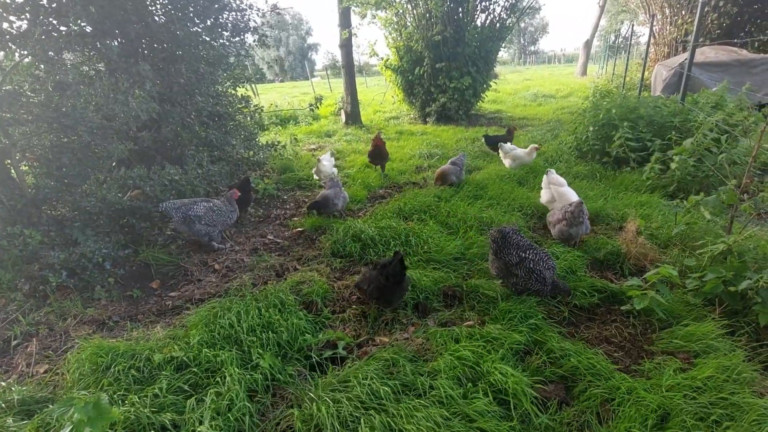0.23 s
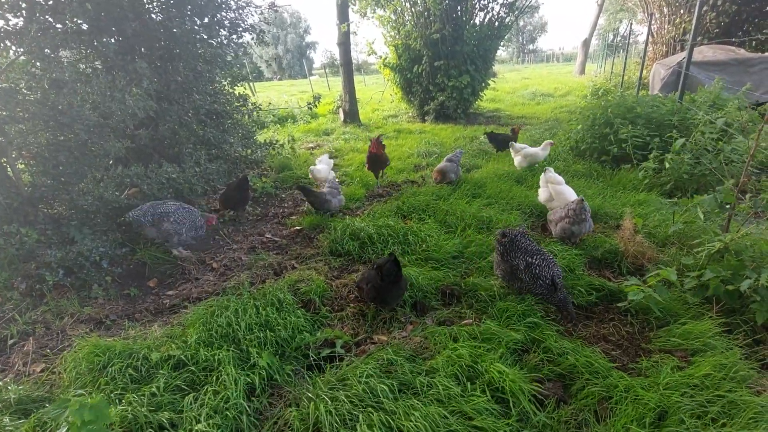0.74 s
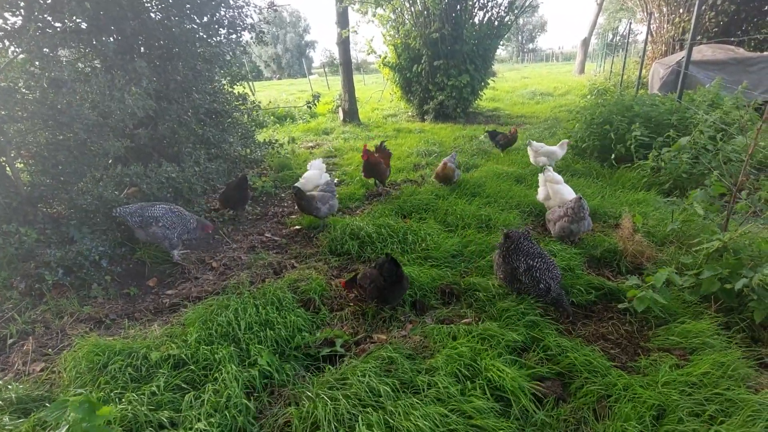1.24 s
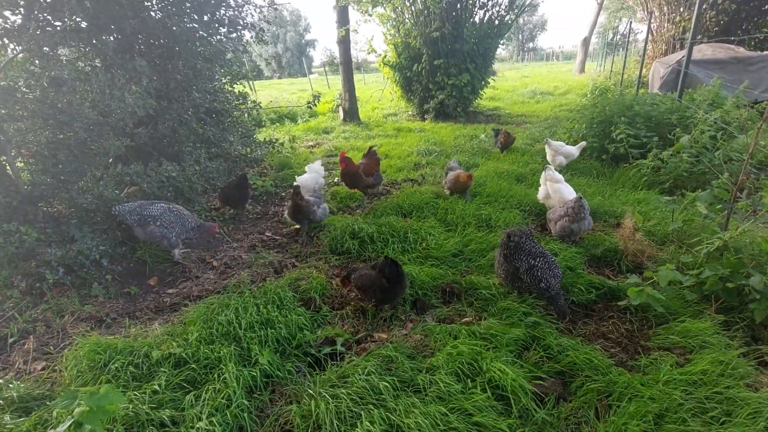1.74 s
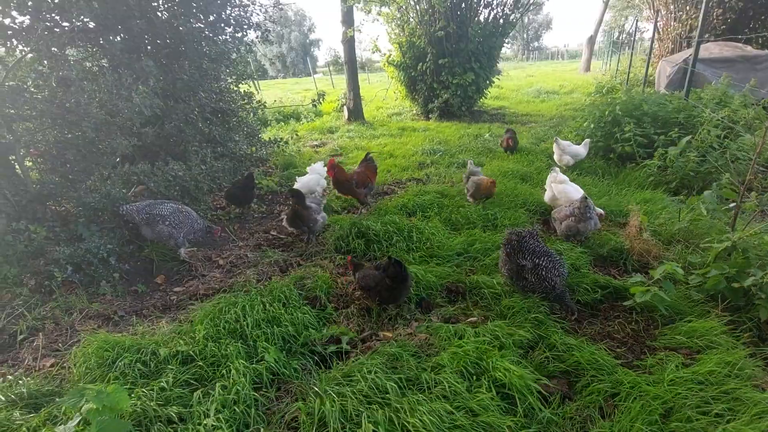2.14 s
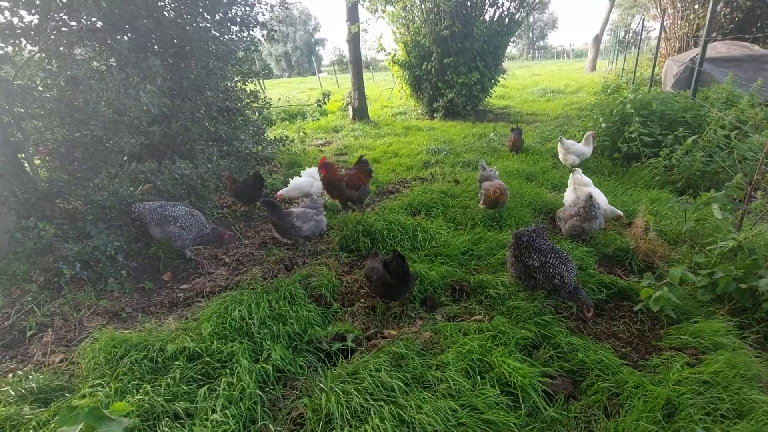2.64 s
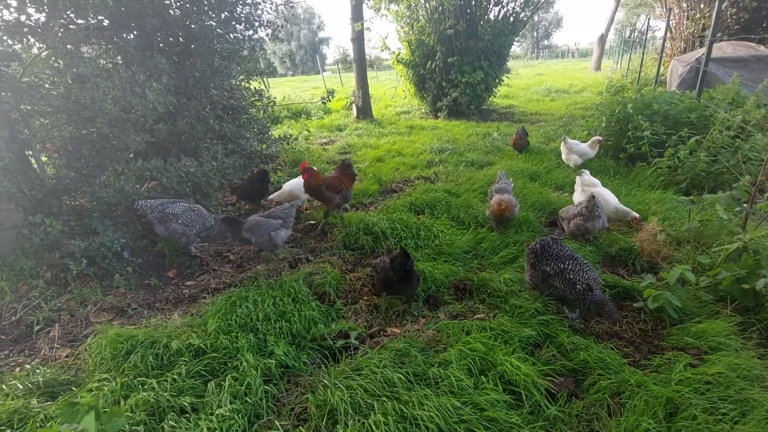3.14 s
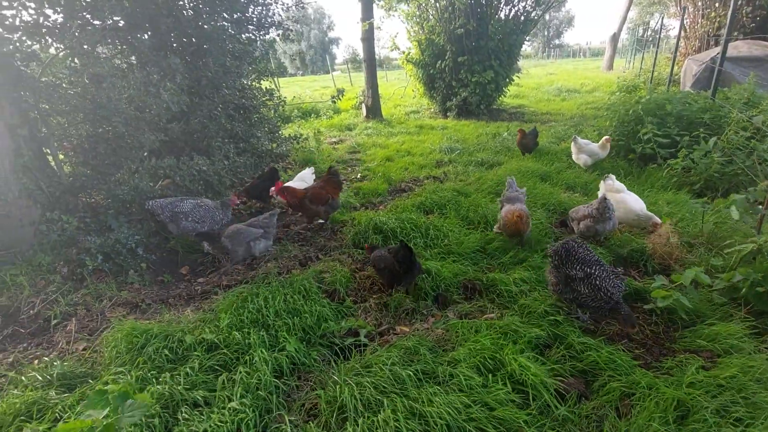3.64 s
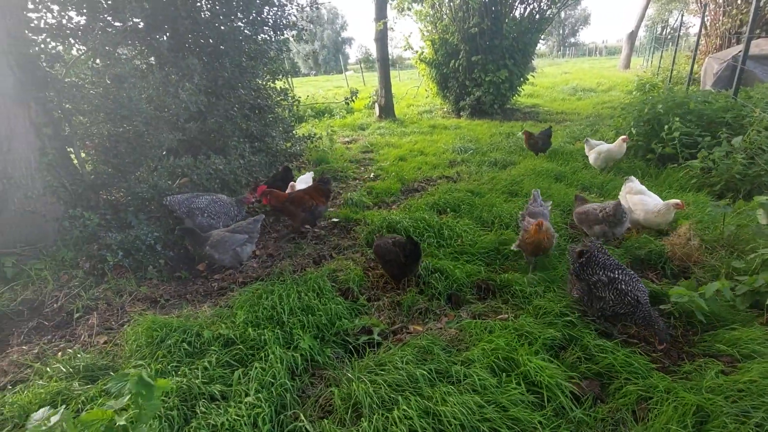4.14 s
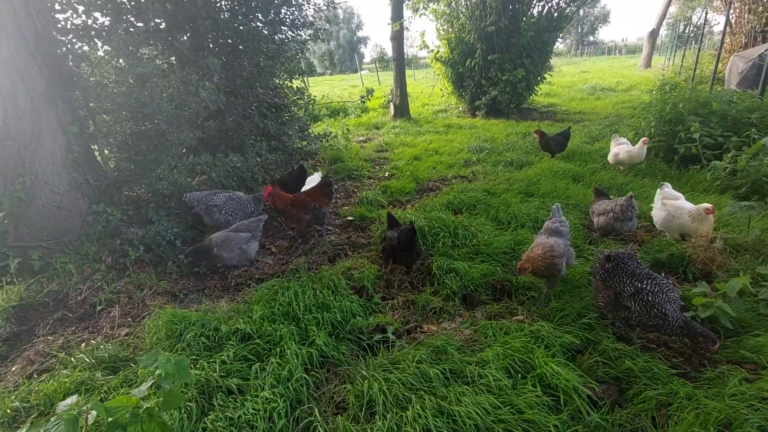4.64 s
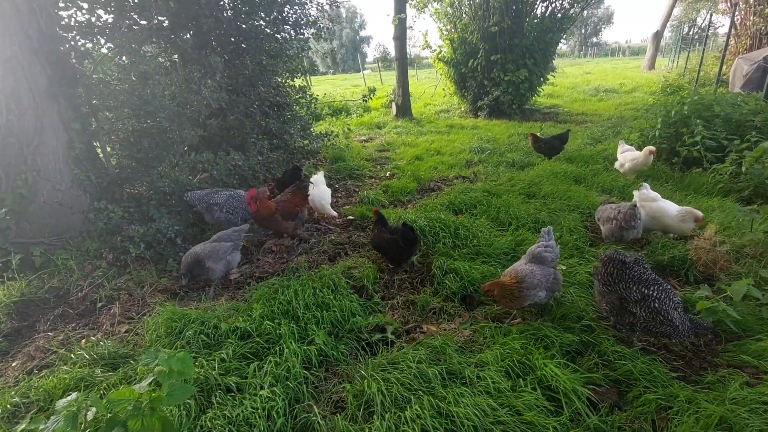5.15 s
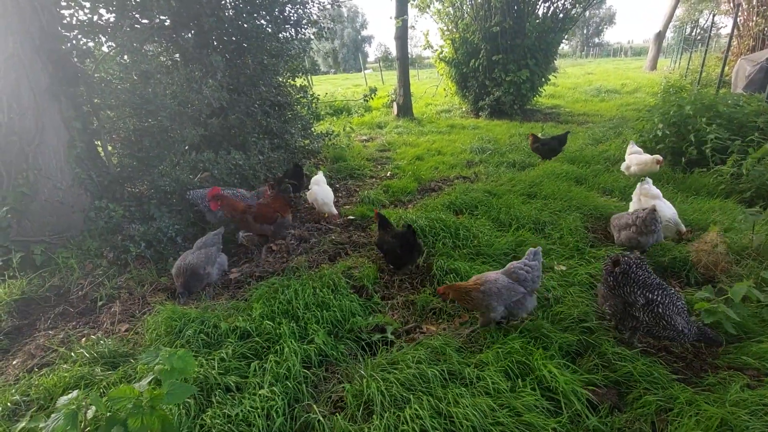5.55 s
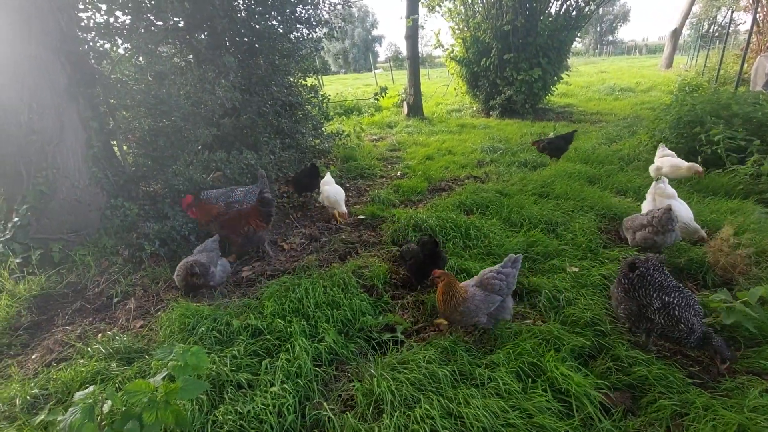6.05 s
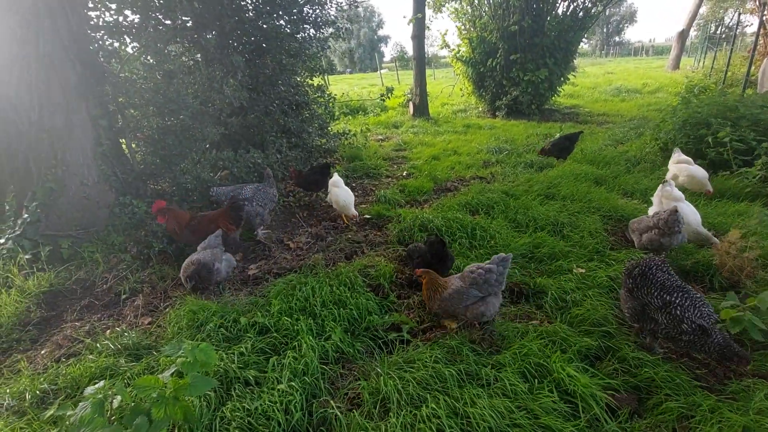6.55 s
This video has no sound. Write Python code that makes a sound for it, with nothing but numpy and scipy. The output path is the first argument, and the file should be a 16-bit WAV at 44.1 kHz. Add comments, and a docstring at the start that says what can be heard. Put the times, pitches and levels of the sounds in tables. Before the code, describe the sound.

A quiet open garden with steady, slightly sinking hiss and almost no echo. Small wind puffs begin around 0.3 s, and low thumps bump the microphone at 0.7-1.1 s. Soft coos and first faint clucks come at 1.3-1.7 s, then three clearer throaty clucks at about 2.1, 2.2 and 2.4 s. Wind returns from 2.5 s; a thin, wavering hen whine runs 2.6-3.0 s, ending on a lower tone, before the strongest low buffeting at 3.1-3.4 s, with small coos partly buried. As the wind eases, a string of short muffled clucks runs from 3.8 to 4.7 s, with a tiny tick near 4.4 s and light grass rustles. From 4.8 to 5.7 s, creaky low growls, hollow croons and brief coos overlap. Afterwards it is calm: crisp faint grass swishes around 5.6-6.0 and 6.6 s, one very soft coo at 6.3 s, and hiss.

```python
"""A steady garden hiss opens the scene, with soft puffs of wind that soon swell and thump at two mic ports.
Hens then call: clucks, coos, growls and croons pulse through throat resonances; a whine stacks harmonics.
Wind is lumpy low noise plus one-cycle thumps; grass is crackling noise that hisses in gusts and rustles.
A beak ticks once on a twig, and a thin scatter from bushes, ground and trees trails the calls."""
import sys
import numpy as np
from scipy import signal
from scipy.fft import rfft, irfft
from scipy.io import wavfile
from scipy.ndimage import uniform_filter1d, map_coordinates

SR = 44100
rng = np.random.default_rng(int(sys.argv[2]) if len(sys.argv) > 2 else 0)


def materialize(psi):
    """Save the field psi as 16-bit PCM at rate SR to the path in sys.argv[1].

    A 1-D psi becomes a single channel; in a 2-D psi each row is a channel.
    """
    bounded = np.clip(np.atleast_2d(psi).T, -1, 1)
    quanta = np.round(bounded * 32767).astype(np.int16)
    wavfile.write(sys.argv[1], SR, quanta)


N = 299350
TIME = np.arange(N) / SR
FREQS = np.fft.rfftfreq(N, 1 / SR)

# hush spectrum: [freq_hz, relative level_db per Hz]
AIR_SPECTRUM = [(25, -24), (55, 3), (110, -15), (290, -5.5), (730, -9), (1360, -14), (4200, -13),
                (7460, -16.5), (8670, -22), (12000, -15), (15800, -19.5)]
# stereo tilt of the hush: [freq_hz, left_minus_right_db]
AIR_BALANCE_BY_HZ = [(100, 6), (2300, -1), (4400, -0.5), (7000, -5.5), (12000, -3)]
# how alike the hush is at both ports: [freq_hz, likeness 0 to 1]
AIR_LIKENESS_BY_HZ = [(100, 1), (600, 0.66), (1400, 0)]
AIR_DB, AIR_DB_PER_S = -54, -0.3351  # the hush sinks slowly

# gusts of wind: [centre_s, half_length_s, level_db, left_minus_right_db]
GUST_EVENTS = [(0.258, 0.069, -48, 1.5), (0.576, 0.086, -48.5, -1), (0.756, 0.047, -32.5, -2.5),
               (0.853, 0.024, -33, -1), (0.987, 0.16, -45, -2), (2.267, 0.28, -45.5, -3.5),
               (2.668, 0.16, -40, -7.5), (3.175, 0.18, -36, -2), (3.636, 0.37, -41, 0),
               (6.72, 0.082, -59, 6)]
# wind turbulence spectrum: [freq_hz, relative level_db per Hz]
BUFFET_SPECTRUM = [(20, -17), (60, 2), (130, 1.5), (180, -8), (265, -8), (400, -18), (600, -35.5),
                   (1500, -82)]
# single eddies that thump: [centre_s, level_db, pitch_hz, left_minus_right_db]
THUMP_EVENTS = [(0.49, -36.5, 80.5, 3), (0.712, -25.5, 156, 2), (0.767, -20.5, 139, -11),
                (0.846, -23.5, 234, 0), (1.053, -28, 83.4, 3), (2.497, -28, 160, 3), (2.79, -31.5, 241, -9),
                (3.08, -19.5, 179, 2), (3.096, -19, 92, 1), (3.177, -24, 204, -4), (3.198, -26, 233, -1),
                (3.236, -16.5, 130, 2), (3.255, -18, 197, 2), (3.36, -21, 71.4, -2), (3.38, -24.5, 119, 0),
                (4.085, -38.5, 170, -3)]
BREEZE_DB, BREEZE_DB_PER_S = -57, -2  # the light air between gusts dies down
GUST_STEEPNESS = 2.44  # 2 is a bell; more gives a flat top with sudden ends
# stronger gusts hold smaller eddies: exponent, lower edge of the bright part, gust level that leaves it as is
GUST_BRIGHTENS, GUST_BRIGHT_HZ, GUST_FULL_DB = 0.4, 230, -40

# grass spectrum: [freq_hz, relative level_db per Hz]
GRASS_SPECTRUM = [(1200, -5), (3500, 1), (5500, -1.5), (8800, -5.5), (11500, 2), (15500, -7)]
# rustles in the grass: [centre_s, half_length_s, level_db, crisp_top_db]
RUSTLE_EVENTS = [(0.716, .018, -62, -5), (0.79, 0.08, -66, 0), (4.21, 0.078, -59, 2),
                 (4.36, 0.062, -68, 12.5), (4.632, 0.015, -56.5, 2), (4.763, .08, -65, 7.5),
                 (5.587, 0.041, -58.5, -1), (5.94, 0.01, -64.5, 9.5), (6.025, 0.033, -59.5, 6.5),
                 (6.604, 0.057, -61.5, 5.5)]
GUST_HISS_DB, GUST_CRISP_DB = -20.5, -17  # stirred grass relative to the gust; gain of its crisp top
CRACKLES_PER_S, CRACKLE_DB = 260, -6.5  # dry blades snap; level relative to the rubbing noise
BLADE_PATCH_DB = 3  # how far the colour of a swish shifts

TICK_S, TICK_DB, TICK_HZ, TICK_WIDTH_HZ, TICK_DECAY_S = 4.362, -50.5, 1900, 700, 0.0072  # level before decay

# soft coos: [start_s, length_s, level_db, middle_pitch_hz, glide_hz_per_s, throat_hz]
COO_NOTES = [(1.27, 0.074, -56, 283, -400, 830), (1.349, 0.083, -61.5, 340, 200, 965),
             (1.495, 0.072, -54, 338, 697, 880), (2.792, 0.059, -54, 396, -450, 830),
             (3.064, 0.05, -54.5, 324, 351, 950), (3.267, 0.098, -55.5, 329.3, 200, 950),
             (3.435, 0.033, -65, 408, 0, 800), (3.57, 0.029, -55.5, 315, -100, 890),
             (3.597, 0.083, -66, 408, -450, 810), (5.279, 0.055, -55.5, 376, 1002, 754),
             (5.385, 0.037, -56.5, 382, 204, 780), (5.44, 0.031, -56.5, 294, -78, 880),
             (5.518, 0.034, -53.5, 306, -100, 600), (5.561, 0.062, -60.5, 414, -250, 830),
             (6.284, 0.094, -65.5, 300, 496, 890)]
# throat resonances in a coo: [multiple of throat_hz, width_hz, level_db]
COO_RESONANCES = [(.34, 200, -2), (.68, 220, -7), (1, 320, 0)]
COO_ARCH_DB = 2.5  # drop of a coo's ends below its table level
# growls: [start_s, length_s, start_level_db, start_pitch_hz, sag_hz_per_s, throat_hz]
GROWL_NOTES = [(4.833, 0.38, -56.5, 152, 92.5, 695), (5.031, 0.18, -56, 164, 87, 710),
               (5.436, 0.23, -66, 152, 28.2, 710)]
# throat resonances in a growl: [multiple of throat_hz, width_hz, level_db]
GROWL_RESONANCES = [(.44, 140, 1), (.78, 240, -1), (1.02, 210, 2.5), (1.2, 200, -4)]
GROWL_SWELL_DB_PER_S, GROWL_RELEASE_S = 9, 0.027
# croons: [start_s, length_s, level_db, start_pitch_hz, glide_hz_per_s, throat_hz]
CROON_NOTES = [(5.179, 0.07, -54, 470, 329, 800), (5.295, 0.093, -57.5, 476, 75, 536),
               (5.422, 0.195, -53, 463, -140, 696)]
# throat resonances in a croon: [multiple of throat_hz, width_hz, level_db]
CROON_RESONANCES = [(.74, 340, 0), (1.17, 300, -10)]
CROON_ARCH_DB = 3  # drop of a croon's ends below its table level
# course of the whine, which catches, levels out, then breaks lower: [time_s, pitch_hz, level_db]
WHINE_COURSE = [(2.595, 437.5, -50.5), (2.626, 397.3, -51), (2.654, 441.2, -53), (2.68, 415, -59),
                (2.72, 440, -55), (2.8, 443, -53.5), (2.9, 441, -62), (2.915, 410, -61), (2.95, 410, -50.5),
                (2.975, 414.4, -47.5), (2.994, 427, -58)]
# first three harmonics of the whine: [level_db]
WHINE_HARMONIC_LEVELS = [-9.5, 0, -3.5]
WHINE_SHUT_S, WHINE_SHUT_DB_PER_S = 2.82, -330  # the beak closes and muffles the top harmonic
# clucks: [strongest_beat_s, level_db, pulse_rate_hz, throat_hz, beak_edge_hz]
CLUCK_NOTES = [(1.313, -52, 141.4, 906, 1350), (1.599, -49, 332, 960, 1410),
               (1.739, -52.5, 204, 1080, 1300), (2.075, -46.5, 182.4, 860, 1540),
               (2.229, -47.5, 185, 860, 1590), (2.384, -44.5, 190, 900, 1980),
               (3.793, -52.5, 183, 905, 1190), (3.927, -47.5, 185.6, 840, 1130),
               (4.076, -45.5, 213, 916, 1240), (4.265, -45, 173, 867, 1100), (4.32, -53, 176, 980, 1180),
               (4.452, -46, 199, 906, 1230), (4.582, -45, 194, 936, 1420), (4.723, -47, 245, 890, 1120)]
# throat resonances in a cluck: [multiple of throat_hz, width_hz, level_db]
CLUCK_RESONANCES = [(.28, 100, -0.5), (.69, 145, -1), (.95, 240, 6), (1.17, 220, -3), (1.62, 334, -8.5)]
CLUCK_SWELL_S, CLUCK_FADE_S, CLUCK_LEAD_S = 0.018, 0.0061, 0.016  # lead: from onset to the strongest beat
CLUCK_OPENS_PER_S = 12.6  # resonances rise as the beak opens (natural log of frequency per s)

PORT_DELAY_S = 0.000096  # the calls reach the left port first
FAR_T60_S, FAR_DB = 0.31, -35  # trees further off answer faintly
EDGE_HZ = 15850  # top of the recorder's band


def amp(db):
    """Decibels to gain."""
    return 10 ** (np.asarray(db) / 20)


def unit(x):
    """Scales to rms 1."""
    return x / np.sqrt(np.mean(x ** 2) + 1e-20)


def read(points, hz):
    """Reads a spectrum table on a log-frequency axis."""
    f, value = np.transpose(points)
    return np.interp(np.log(hz + 1), np.log(f + 1), value)


def panned(balance_db):
    """Left and right gains that share a left-minus-right difference."""
    return amp(np.array([[.5], [-.5]]) * balance_db)


def add(mix, s, sound):
    """Adds a sound to the mix at time s."""
    part = mix[..., max(round(s * SR), 0):][..., :sound.shape[-1]]
    part += sound[..., :part.shape[-1]]


def wander(size, hz):
    """Smooth random drift of rms near 1, taking about hz new values a second."""
    points = rng.standard_normal(4096)
    return map_coordinates(points, [np.arange(size) * hz / SR], order=3, mode="mirror")


def bell(s, half, steepness=2):
    """A smooth swell of height 1 around time s."""
    return np.exp(-abs((TIME - s) / half) ** steepness / 2)


def noise(spectrum, likeness=0, balance_db=0):
    """Two channels of coloured noise, partly alike."""
    a, b = rfft(rng.standard_normal((2, N)))
    c = np.clip(likeness, -1, 1)
    pair = np.array([a, c * a + np.sqrt(1 - c ** 2) * b])
    coloured = pair * amp(read(spectrum, FREQS)) * panned(balance_db)
    return unit(irfft(coloured, N))


def resonate(x, hz, width):
    """A steep resonance of gain 1 that follows the curve hz."""
    turn = np.exp(2j * np.pi * np.cumsum(hz * np.ones(len(x))) / SR)
    r = np.exp(-np.pi * width / SR)
    # shift the resonance to zero frequency, smooth there, shift back
    smooth = signal.lfilter([(1 - r) ** 2], [1, -2 * r, r * r], x / turn)
    return 2 * (turn * smooth).real


def air():
    """The steady hush of the garden and the hiss of the microphone, as coloured noise."""
    likeness = read(AIR_LIKENESS_BY_HZ, FREQS)
    balance_db = read(AIR_BALANCE_BY_HZ, FREQS)
    hush = noise(AIR_SPECTRUM, likeness, balance_db)
    return hush * amp(AIR_DB + AIR_DB_PER_S * TIME)


def gusts():
    """Strength of the wind at each port: gusts swell and pass over a dying breeze."""
    power = sum((amp(db) * bell(s, half, GUST_STEEPNESS) * panned(side_db)) ** 2
                for s, half, db, side_db in GUST_EVENTS)
    breeze = amp(BREEZE_DB + BREEZE_DB_PER_S * TIME)
    return np.sqrt(power + breeze ** 2)


def wind(level_db=-1, cycles=0.46):
    """Lumpy turbulence at each port, with single thumps of about one cycle."""
    # eddies pass both ports together, and each port also meets its own
    shared_db = 5 * np.tanh(wander(N, 28))
    own_db = 5 * np.tanh([wander(N, 55), wander(N, 55)])
    strength = gusts()
    buffet = noise(BUFFET_SPECTRUM, likeness=.15)
    high_pass = signal.butter(2, GUST_BRIGHT_HZ, "high", fs=SR, output="sos")
    fine = signal.sosfiltfilt(high_pass, buffet)
    fine_gain = (strength / amp(GUST_FULL_DB)) ** GUST_BRIGHTENS
    turbulence = buffet + fine * (fine_gain - 1)
    out = turbulence * strength * amp(level_db + shared_db + own_db)
    t = np.arange(-SR // 20, SR // 20) / SR
    for s, db, hz, balance_db in THUMP_EVENTS:
        # the two ports hear the eddy at different phases
        phase = 2 * np.pi * rng.random() + np.array([[.7], [-.7]]) * rng.choice([-1, 1])
        eddy = np.cos(2 * np.pi * hz * t + phase) / np.cosh(hz * t / cycles)
        add(out, s + t[0], amp(db) * eddy * panned(balance_db))
    return out


def blades():
    """Grass sliding over grass: a hiss of shifting colour with tiny snaps in it."""
    snaps = (rng.random(N) < CRACKLES_PER_S / SR) * rng.standard_normal((2, N))
    raw = rng.standard_normal((2, N)) + amp(CRACKLE_DB) * unit(snaps)
    rub = unit(irfft(rfft(raw) * amp(read(GRASS_SPECTRUM, FREQS)), N))
    z = signal.stft(rub, nperseg=256)[2]
    # random patches, smoothed over frequency and then time
    patches = uniform_filter1d(rng.standard_normal(z.shape[1:]), size=12, axis=0)
    patches = unit(uniform_filter1d(patches, size=7, axis=1))
    return unit(signal.istft(z * amp(BLADE_PATCH_DB * patches))[1][:, :N])


def grass(stir_db=-70):
    """Blades brush past each other: a restless stir, a hiss in each gust, and swishes of varied crispness."""
    swish = blades()
    top = signal.sosfiltfilt(signal.butter(2, 8500, "high", fs=SR, output="sos"), swish)
    restless_db = 5 * np.tanh(wander(N, 10)) + 2 * wander(N, 60)
    stir = amp(stir_db) * top * amp(restless_db)
    dull_swish = swish + (amp(GUST_CRISP_DB) - 1) * top
    blown = amp(GUST_HISS_DB) * gusts().mean(0) * dull_swish
    rustles = sum(amp(db) * bell(s, half) * (swish + (amp(crisp_db) - 1) * top)
                  for s, half, db, crisp_db in RUSTLE_EVENTS)
    return stir + blown + rustles


def tick():
    """A beak ticks on a twig: a noise burst rings one resonance and decays."""
    out, t = np.zeros(N), np.arange(SR // 20) / SR
    ring = unit(resonate(rng.standard_normal(len(t)), TICK_HZ, TICK_WIDTH_HZ))
    add(out, TICK_S, amp(TICK_DB) * ring * np.exp(-t / TICK_DECAY_S))
    return out


def throat(drive, hz, modes, edge_hz):
    """The throat's resonances; a nearly shut beak muffles everything above edge_hz."""
    voiced = sum(amp(db) * resonate(drive, hz * ratio, width) for ratio, width, db in modes)
    return signal.sosfilt(signal.butter(5, edge_hz, fs=SR, output="sos"), voiced)


def pulses(turns):
    """One click of the syrinx at each whole turn."""
    return np.diff(np.floor(turns), prepend=np.floor(turns[0]))


def call(rows, modes, edge_hz, jitter, shimmer, rough):
    """A held call: uneven pulses, each with a puff of air, pass the moving throat."""
    s, *columns = np.transpose(rows)
    t = np.arange(s[0], s[-1], 1 / SR)
    level_db, hz, throat_hz = (np.interp(t, s, c) for c in columns)
    turns = np.cumsum(hz * (1 + jitter * wander(len(t), 130))) / SR
    puffs = np.exp(-(turns % 1) / 0.57) * rng.standard_normal(N)[:len(t)]
    clicks = unit(pulses(turns) - hz / SR) * (1 + shimmer * wander(len(t), 116.4))
    voice = throat(clicks + rough * unit(puffs), throat_hz, modes, edge_hz)
    # even out the running level so that level_db sets it
    voice = voice / np.sqrt(uniform_filter1d(voice ** 2, size=1500) + 1e-12)
    return s[0], amp(level_db) * voice * signal.windows.tukey(len(t), 0.0052 * SR / len(t))


def arch(s, length, db, first_hz, last_hz, throat_hz, arch_db):
    """A note that swells and fades as its pitch glides: rows (time_s, level_db, pitch_hz, throat_hz)."""
    return [(s, db - arch_db, first_hz, throat_hz),
            (s + length / 2, db + 2.0, (first_hz + last_hz) / 2, throat_hz),
            (s + length, db - arch_db, last_hz, throat_hz)]


def coo(s, length, db, hz, glide, throat_hz):
    """A short soft note: breathy pulses glide in pitch about the middle of the note."""
    half_glide = glide * length / 2
    rows = arch(s, length, db, hz - half_glide, hz + half_glide, throat_hz, COO_ARCH_DB)
    return call(rows, COO_RESONANCES, edge_hz=1200, jitter=.021, shimmer=.4, rough=.5)


def growl(s, length, db, hz, sag, throat_hz, fade_db=-6):
    """A creak of uneven pulses that grows louder as they slow down, then lets go."""
    steps = [(0, 0), (length - GROWL_RELEASE_S, 0), (length, fade_db)]
    rows = [(s + t, db + GROWL_SWELL_DB_PER_S * t + drop_db, hz - sag * t, throat_hz)
            for t, drop_db in steps]
    return call(rows, GROWL_RESONANCES, edge_hz=960, jitter=.029, shimmer=.4, rough=.58)


def croon(s, length, db, hz, glide, throat_hz):
    """A hollow note of breathy pulses whose pitch slides a little."""
    rows = arch(s, length, db, hz, hz + glide * length, throat_hz, CROON_ARCH_DB)
    return call(rows, CROON_RESONANCES, edge_hz=1050, jitter=.02, shimmer=.3, rough=.65)


def whine(jitter=0.0144, shimmer=0.29, breath_db=-9):
    """A thin, breathy note of three harmonics that darkens as the beak closes and ends on a lower tone."""
    times, pitch, level_db = np.transpose(WHINE_COURSE)
    t = np.arange(times[0], times[-1], 1 / SR)
    hz = np.interp(t, times, pitch) * (1 + jitter * wander(len(t), 129.5))
    turns = np.cumsum(hz) / SR
    muffled_db = WHINE_SHUT_DB_PER_S * np.maximum(t - WHINE_SHUT_S, 0)
    voice = sum(amp(db + muffled_db * (k > 2)) * np.sin(2 * np.pi * k * turns)
                for k, db in enumerate(WHINE_HARMONIC_LEVELS, 1))
    breath = unit(resonate(rng.standard_normal(len(t)), 2 * hz, 450))
    voice = unit(voice) * (1 + shimmer * wander(len(t), 102.2)) + amp(breath_db) * breath
    return t[0], amp(np.interp(t, times, level_db)) * voice * signal.windows.tukey(len(t), .06)


def cluck(s, level_db, hz, throat_hz, edge_hz, jitter=0.09, rough=0.045):
    """Uneven pulses start abruptly, swell and brighten to one strong beat and die away faster."""
    t = np.arange(-SR // 25, SR // 20) / SR  # zero at the strongest beat
    turns = np.cumsum(hz * (1 + jitter * wander(len(t), 203.2))) / SR
    size = np.exp(np.where(t < 0, t / CLUCK_SWELL_S, -t / CLUCK_FADE_S)) * (t > -CLUCK_LEAD_S)
    beats = pulses(turns - np.interp(0, t, turns)) + rough * rng.standard_normal(len(t))
    opening = np.exp(CLUCK_OPENS_PER_S * np.clip(t, -CLUCK_LEAD_S, CLUCK_FADE_S))
    voice = throat(beats * size, throat_hz * opening, CLUCK_RESONANCES, edge_hz)
    # the level is that of the whole cluck's energy spread over a fiftieth of a second
    return s + t[0], amp(level_db) * voice / np.sqrt(np.sum(voice ** 2) * 50 / SR)


def hens():
    """All the calls of the flock, each voiced by its own syrinx and throat."""
    flock = np.zeros(N)
    voices = (cluck, CLUCK_NOTES), (coo, COO_NOTES), (growl, GROWL_NOTES), (croon, CROON_NOTES)
    for voice, table in voices:
        for row in table:
            add(flock, *voice(*row))
    add(flock, *whine())
    return flock


def garden(x, t60, wet_db):
    """Direct sound and a thin scatter from bushes, ground and trees, different at each port."""
    t = np.arange(SR // 2) / SR
    decay = amp(-60 * t / t60) + amp(FAR_DB - 60 * t / FAR_T60_S)
    sparse = rng.standard_normal((2, len(t))) * (rng.random((2, len(t))) < 2000 / SR)  # 2000 echoes per s
    taps = sparse * (t > .003) * decay
    tail = signal.fftconvolve(x[None], taps / np.linalg.norm(taps[0]), axes=1)[:, :N]
    direct = np.array([x, np.interp(TIME - PORT_DELAY_S, TIME, x)])
    return direct * panned(-0.58) + amp(wet_db) * tail


def scene():
    """Air, wind and grass around the hens and the tick in the garden."""
    calls = garden(hens() + tick(), t60=0.097, wet_db=-9)
    return calls + wind() + grass() + air()


def record(dry):
    """The recorder's band limit: a steep low-pass."""
    low_pass = signal.firwin(511, EDGE_HZ, window=("kaiser", 9), fs=SR)
    return signal.oaconvolve(dry, low_pass[None], "same")


dry = scene()
out = record(dry)
materialize(out)
```